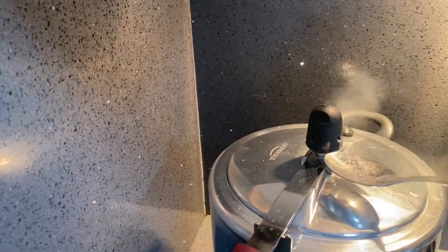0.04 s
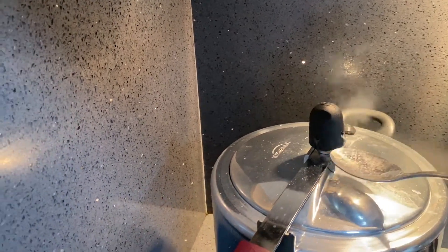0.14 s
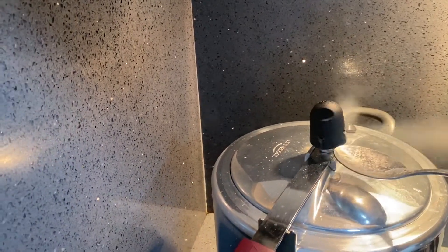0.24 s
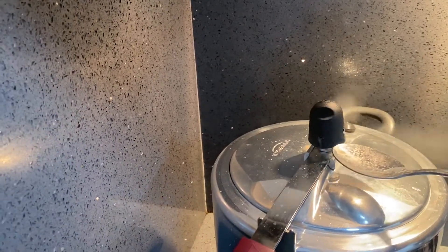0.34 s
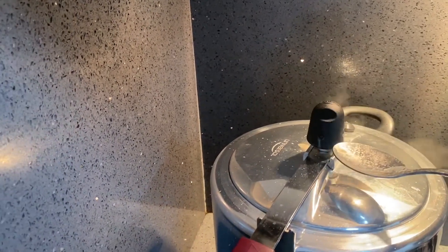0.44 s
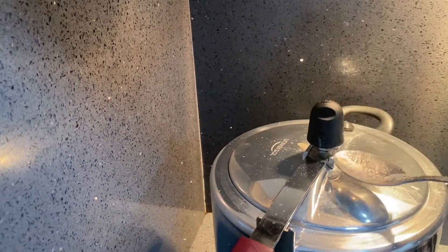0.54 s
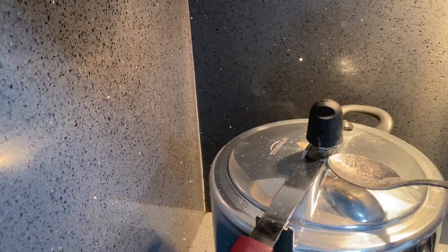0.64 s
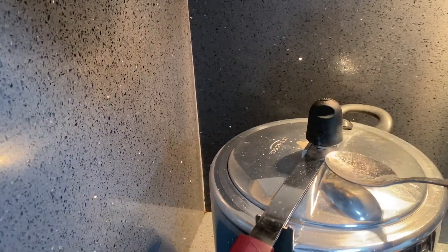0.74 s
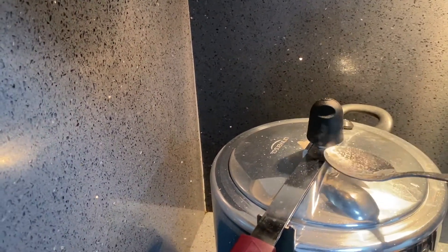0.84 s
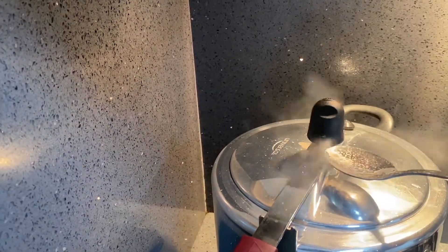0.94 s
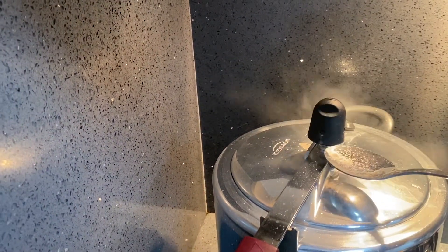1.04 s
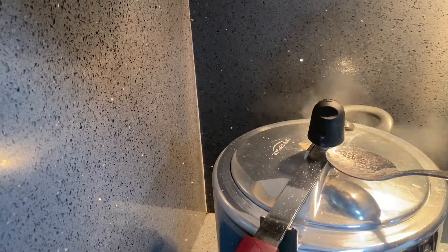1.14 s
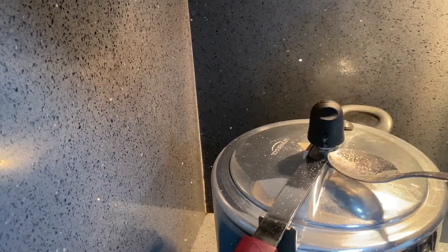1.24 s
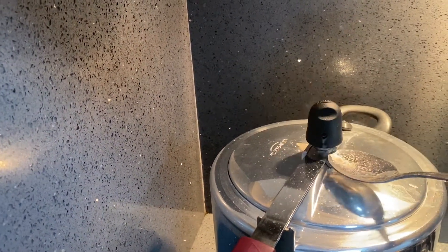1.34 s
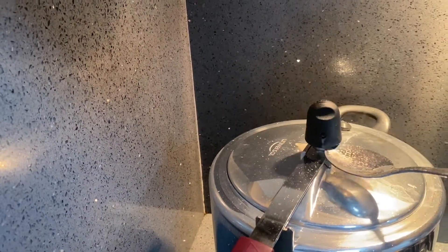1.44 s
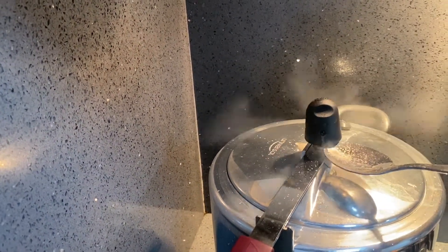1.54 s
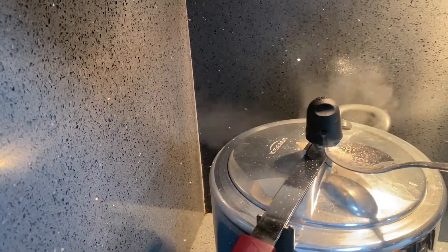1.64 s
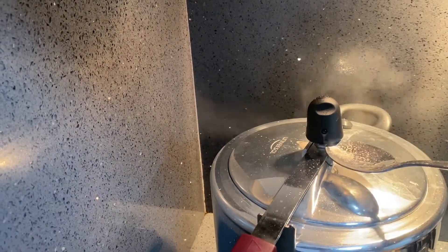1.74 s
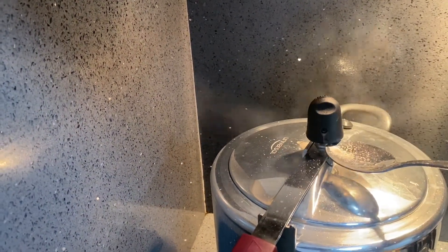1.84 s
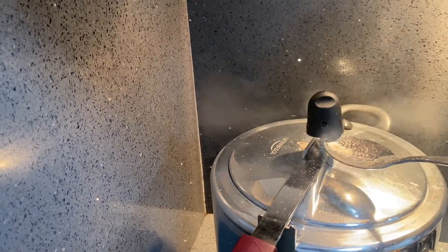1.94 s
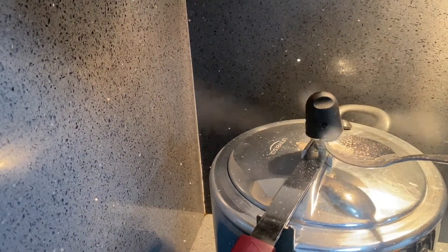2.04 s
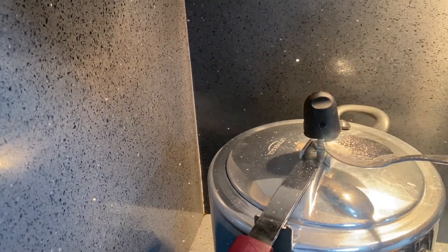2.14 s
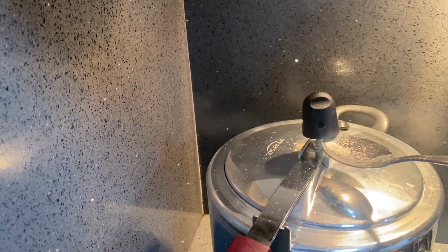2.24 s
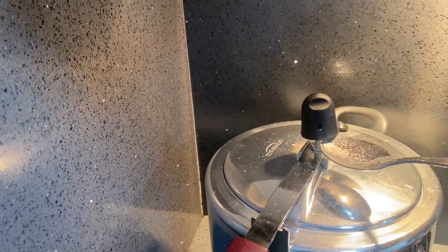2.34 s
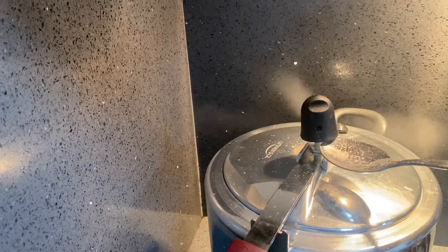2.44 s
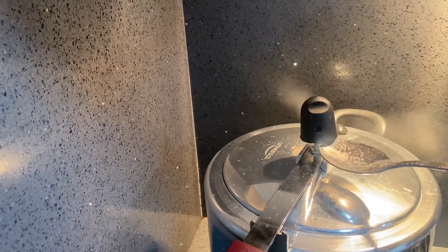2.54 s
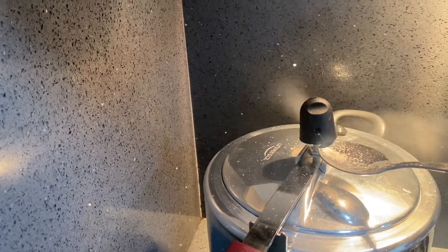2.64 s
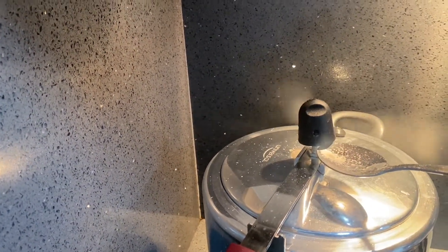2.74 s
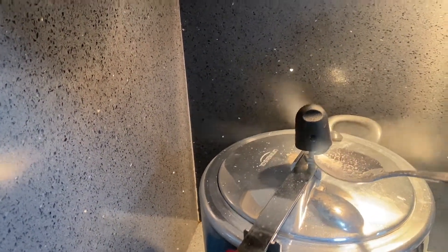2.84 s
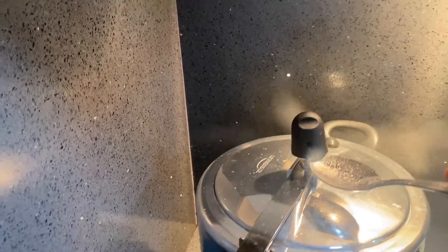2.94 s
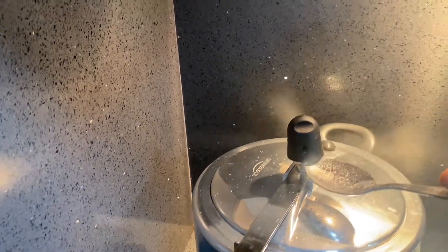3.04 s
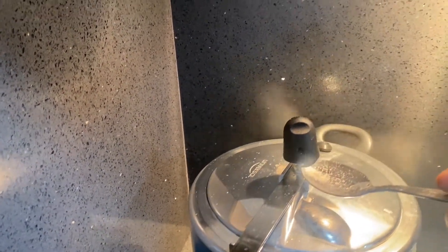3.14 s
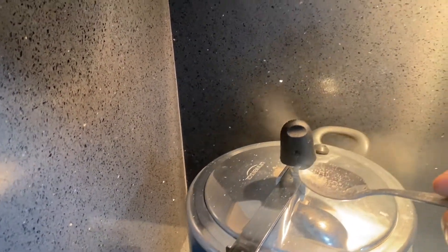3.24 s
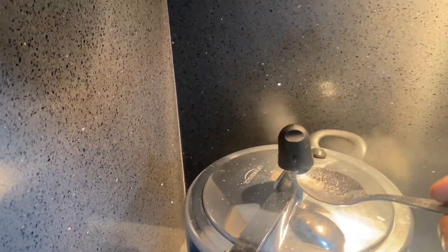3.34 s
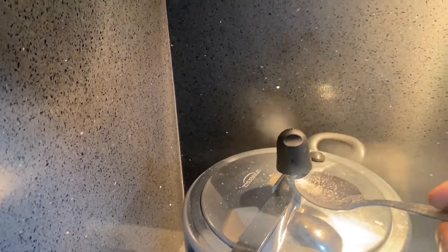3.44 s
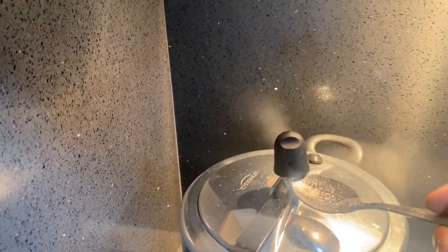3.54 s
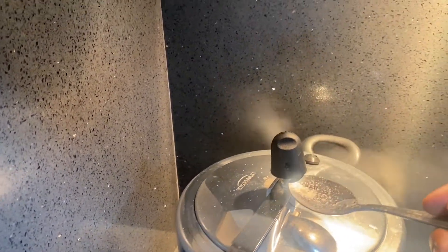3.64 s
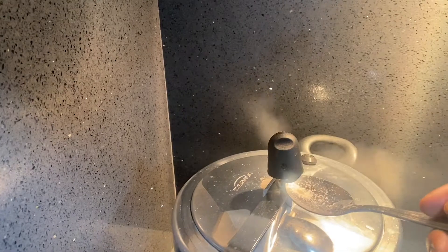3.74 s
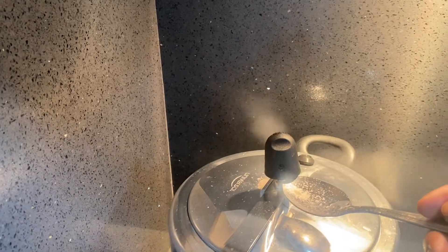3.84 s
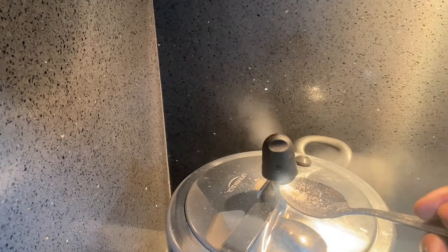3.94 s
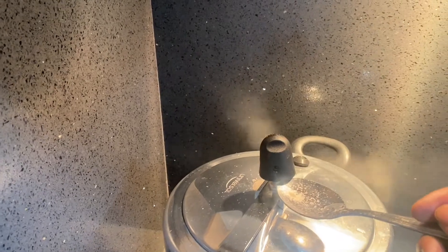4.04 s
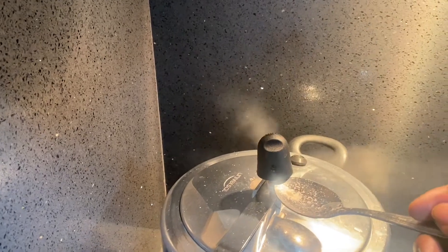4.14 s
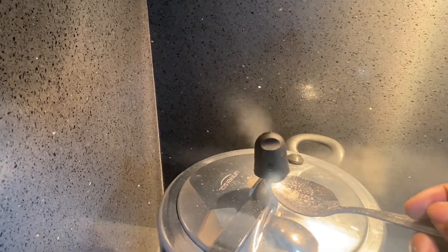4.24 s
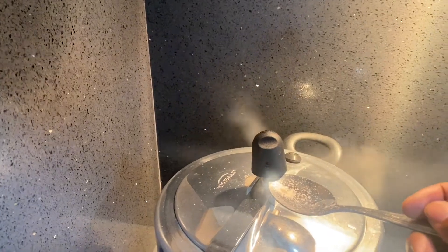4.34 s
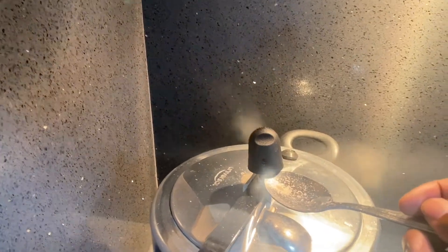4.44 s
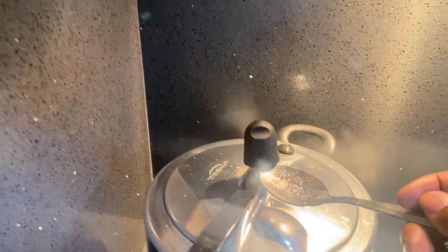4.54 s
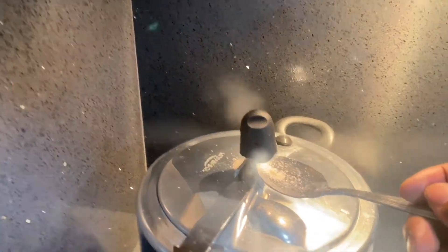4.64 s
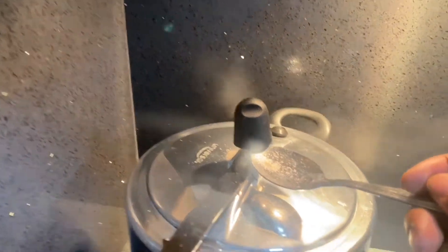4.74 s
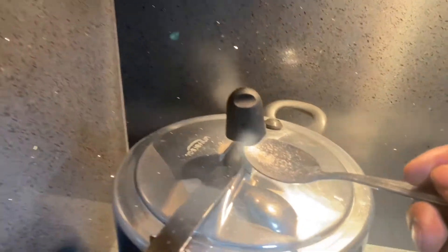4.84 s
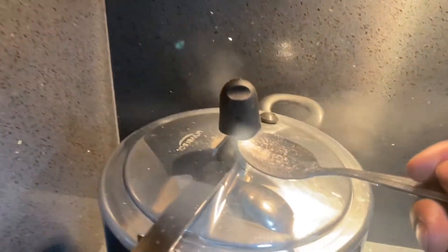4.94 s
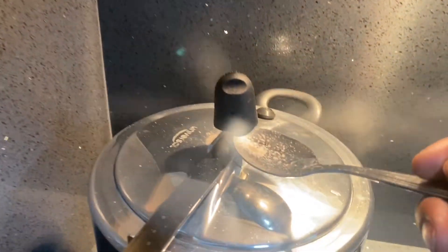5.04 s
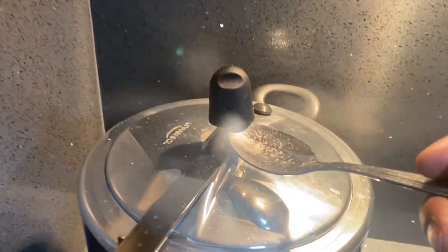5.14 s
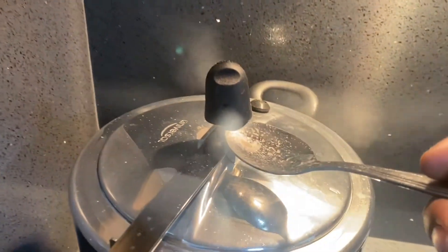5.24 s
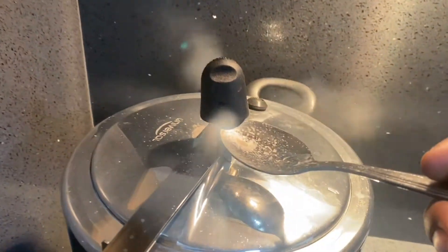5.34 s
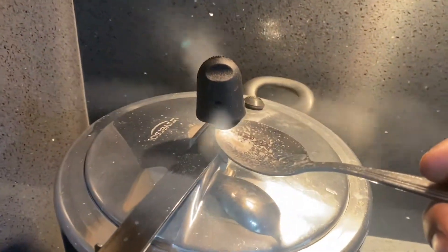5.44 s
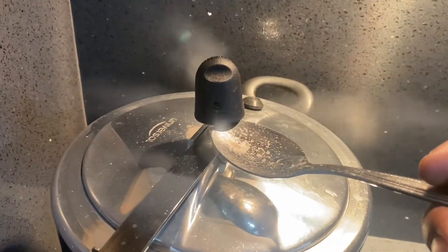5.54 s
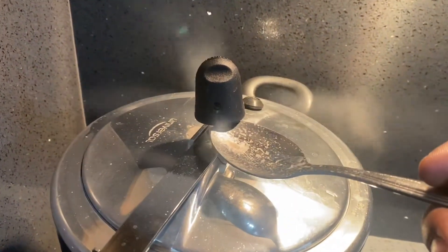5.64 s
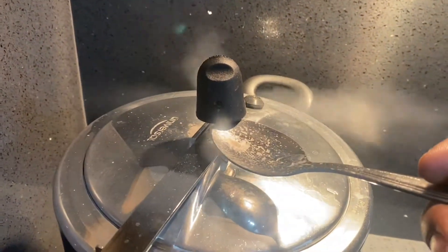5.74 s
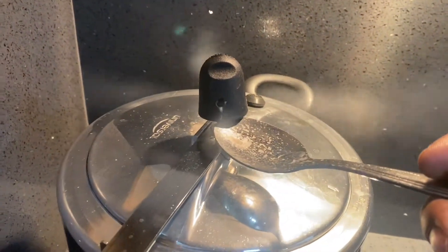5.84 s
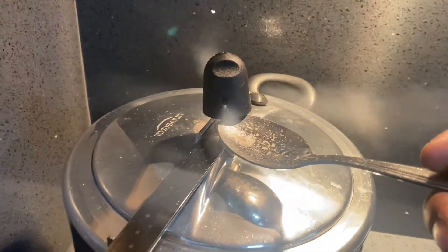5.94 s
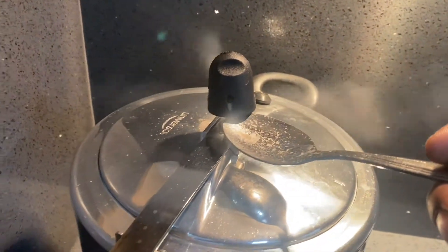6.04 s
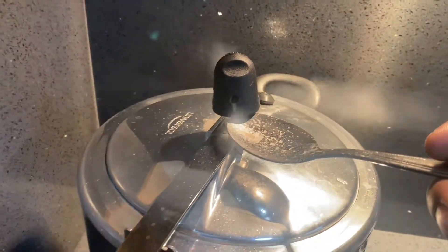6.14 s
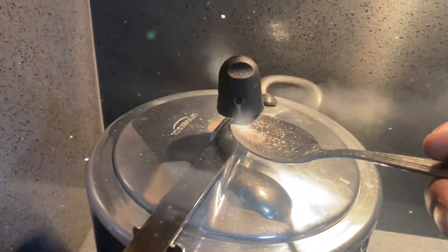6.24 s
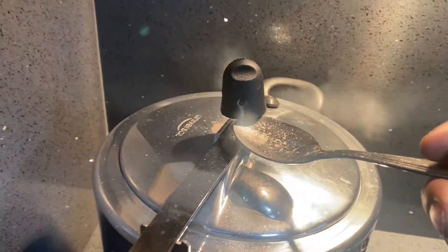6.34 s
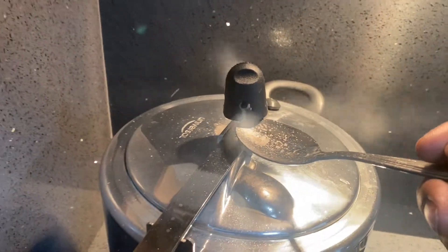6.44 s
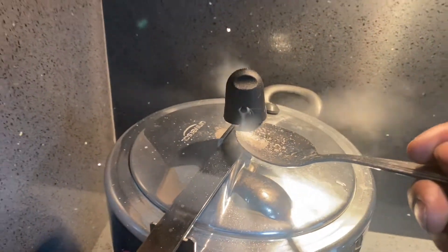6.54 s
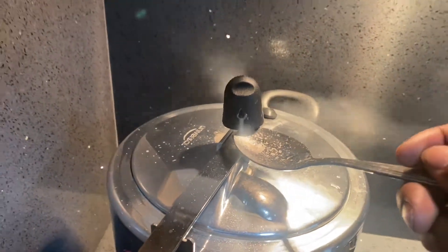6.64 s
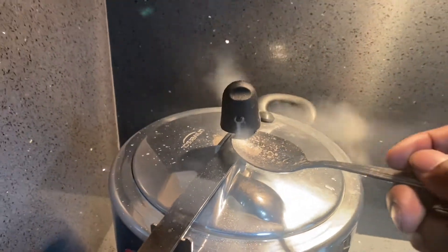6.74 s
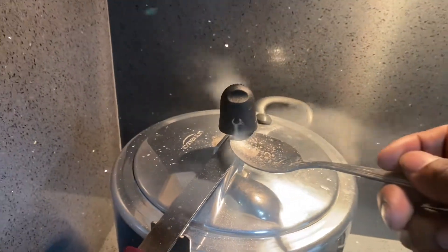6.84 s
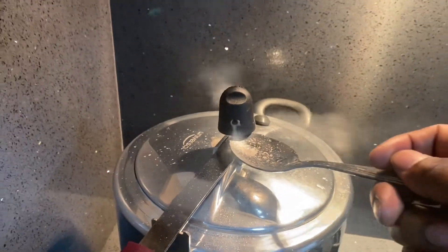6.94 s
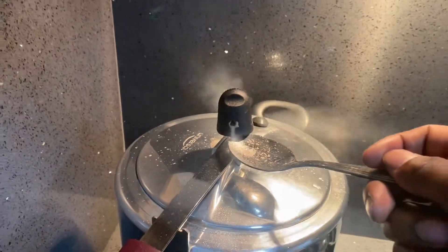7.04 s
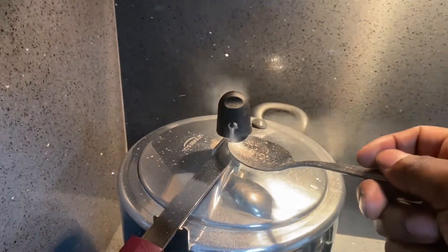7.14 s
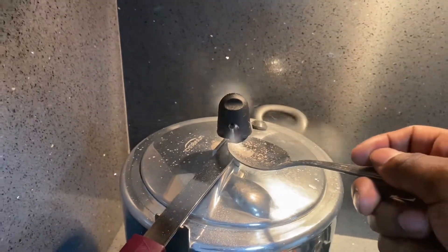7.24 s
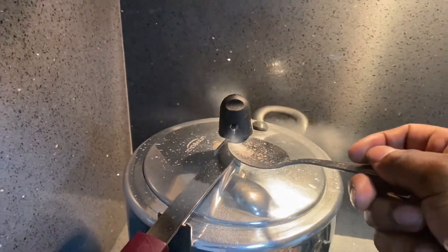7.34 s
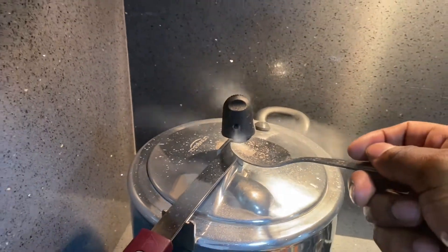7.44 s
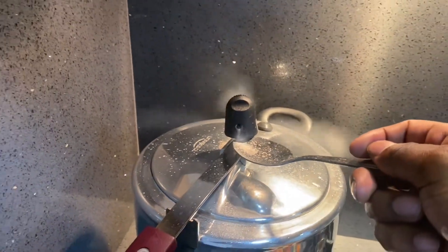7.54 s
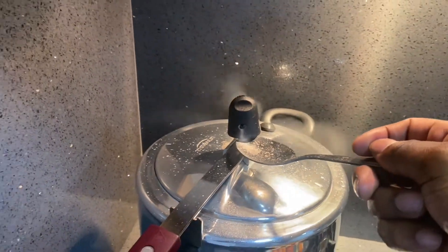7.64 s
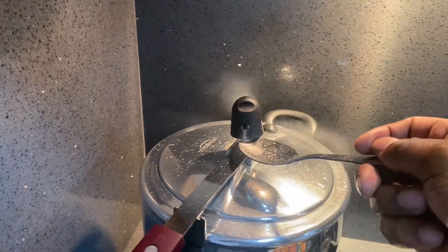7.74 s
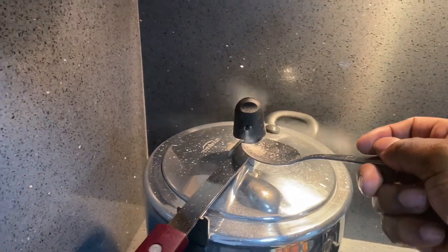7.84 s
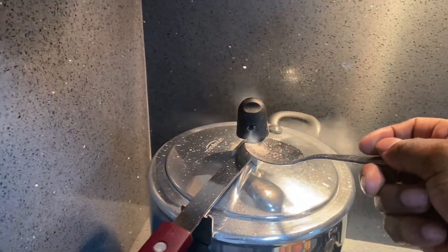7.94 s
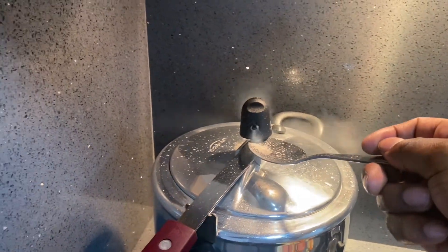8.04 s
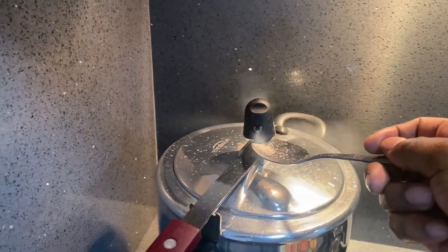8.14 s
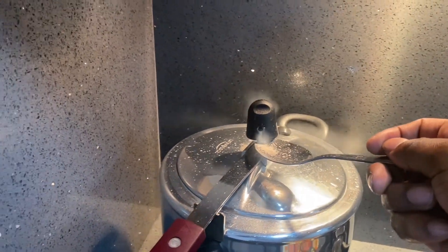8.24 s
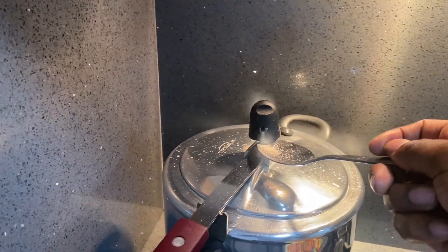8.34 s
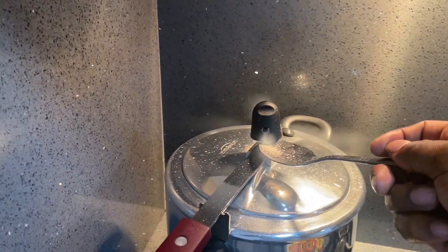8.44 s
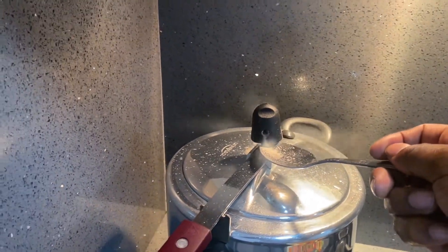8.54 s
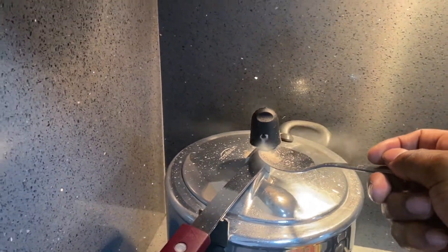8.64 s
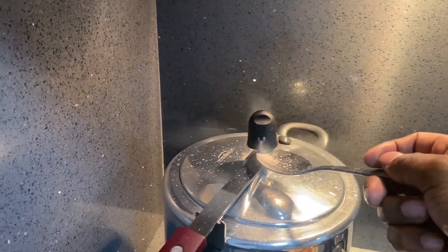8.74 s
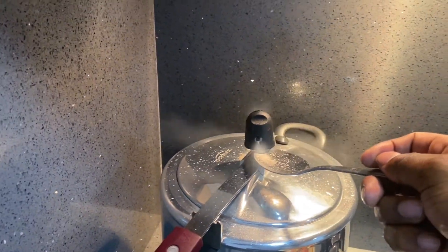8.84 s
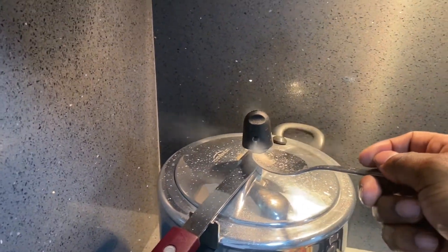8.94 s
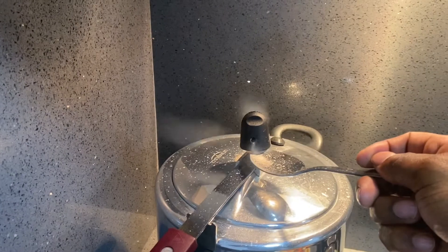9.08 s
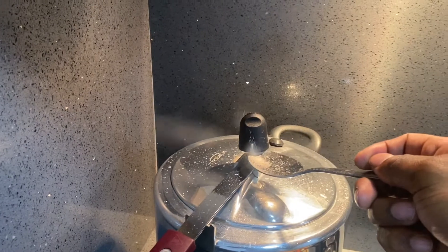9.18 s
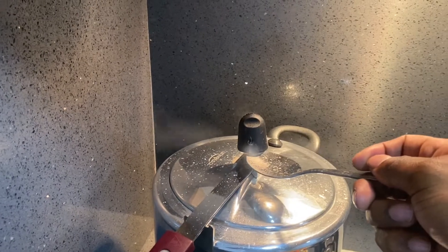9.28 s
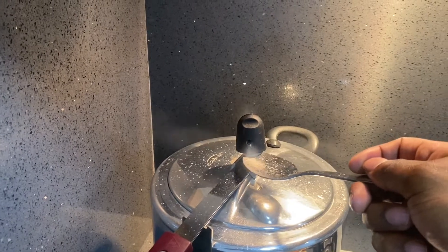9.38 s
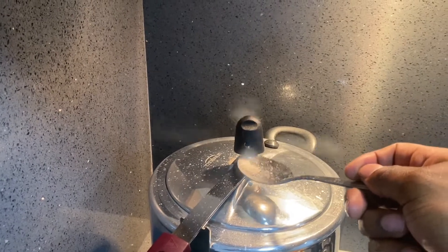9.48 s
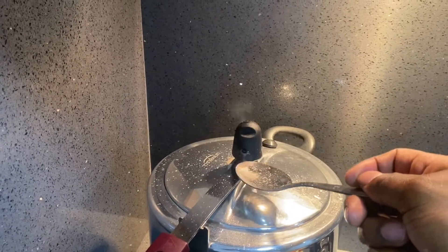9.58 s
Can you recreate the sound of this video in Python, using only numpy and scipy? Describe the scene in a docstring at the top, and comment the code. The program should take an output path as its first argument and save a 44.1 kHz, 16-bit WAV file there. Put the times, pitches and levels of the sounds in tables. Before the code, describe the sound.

Close in a small hard-walled kitchen, a pressure cooker vents as a spoon lifts its weight valve. It is already hissing loudly, shuts with a rattle, gives a second quick burst, then a long jet. The jet gradually softens, then water chokes it into uneven sputters. The cap ticks on its seat, the pot mutters low underneath, and the steam stops abruptly.

```python
"""Steam from a pressure cooker

A spoon lifts the weight valve on a kitchen stove: two short bursts of steam, then a long jet that stops suddenly.
The jet is shaped noise: a hiss from the nozzle and a roar around the cap. It eases as the pressure bleeds off,
and each hold of the spoon gives it other resonances. Later, slugs of water choke the hiss and sputter on the lid.
The cap knocks on its seat, the pot boils underneath, and stirred air puffs on the microphone between hard walls."""
import sys
import numpy as np
from scipy import signal
from scipy.fft import rfft, irfft, next_fast_len
from scipy.io import wavfile
from scipy.ndimage import map_coordinates

SR = 44100
rng = np.random.default_rng(int(sys.argv[2]) if len(sys.argv) > 2 else 0)


def dump(signal):
    """Clip the signal to [-1, 1] and save it as 16-bit WAV at the path in sys.argv[1]."""
    limited = np.clip(np.atleast_2d(signal).T, -1, 1)
    pcm = np.round(limited * 32767).astype(np.int16)
    wavfile.write(sys.argv[1], SR, pcm)


N = 423786
TIME = np.arange(N) / SR  # seconds

HISS_DB, ROAR_DB = -24, -36  # base levels with the valve open, before pressure, water and hold
LEAK_HISS_DB, LEAK_ROAR_DB = -54.5, -69  # base levels of the leak, there even with the valve shut
HISS_TAIL_DB, ROAR_TAIL_DB = -18.5, -10.5  # steam that still escapes while the cap settles
ROAR_WET_DB, ROAR_CHOKED_FROM_DB, ROAR_CHOKED_SHARE = 3, 7, 0.34  # water first feeds the roar, then stifles it too
# how the spoon holds the cap, one row for each gap from LIFTED to TILTED:
# (middle_of_move_s, move_length_s, hiss_db, roar_db, sputter_db, spoon_echo_delay_s)
HOLDS = [(0, .1, 0, -0.6, -55.5, 0.00064), (1.88, 0.14, 0, 0, -62, 0.00051),
         (3.08, 0.48, 0.1, 0.1, -65, 0.000526), (4.72, 0.51, 0.65, 0, -65, 0.0007),
         (6.2, .5, -0.5, .5, -56, 0.000655), (7.08, 0.47, 1.26, 2.5, -49.5, 0.000535)]


def jet(choke_db, wet, roar_pressure_share=0.74, flutter_db=0.46, surge_db=0.72, choked_db=1.8):
    """Valve and pressure set the flow; water chokes the hiss and makes it unsteady."""
    shares = hold_shares()
    hold_hiss_db, hold_roar_db, _, echo_s = np.transpose(HOLDS)[2:] @ shares
    roar, hiss = gap_noise(shares, echo_s)
    surplus_db = pressure_db()

    unsteady_db = choked_db * wet * wobble(45)
    hiss_db = HISS_DB + hold_hiss_db + surplus_db - choke_db + unsteady_db

    stifled_db = ROAR_CHOKED_SHARE * np.maximum(choke_db - ROAR_CHOKED_FROM_DB, 0)
    roar_db = ROAR_DB + hold_roar_db + roar_pressure_share * surplus_db + ROAR_WET_DB * wet - stifled_db

    hiss = hiss * (valve(HISS_TAIL_DB) * amp(hiss_db) + amp(LEAK_HISS_DB))
    roar = roar * (valve(ROAR_TAIL_DB) * amp(roar_db) + amp(LEAK_ROAR_DB))
    flow_db = flutter_db * wobble(350) + surge_db * wobble(40)  # fast flutter, slower surges
    return amp(flow_db) * (hiss + roar)


# the spoon lifts the valve: (opens_s, starts_to_close_s, rise_s, fall_s, level_db)
LIFTS = [(-0.08, 0.332, 0.11, 0.032, 0), (0.863, 1.124, 0.062, 0.024, 0.55),
         (1.402, 9.513, 0.13, .036, -0.35)]
RISE_SHAPE = 0.9  # power of time in the rise
TAIL_DB_PER_S = 142  # how fast the tail dies


def valve(tail_db):
    """How far the valve is open, about 0-1: a rise, a hold, a quick fall and a short tail."""
    opening = np.zeros(N)
    for opens, closes, rise_s, fall_s, db in LIFTS:
        rise = np.clip((TIME - opens) / rise_s, 0, 1) ** RISE_SHAPE
        since = np.maximum(TIME - closes, 0)
        fall = np.exp(-(since / fall_s) ** 2)
        tail = amp(tail_db - TAIL_DB_PER_S * since)
        opening += amp(db) * rise * np.maximum(fall, tail)
    return opening


SURPLUS_DB, VENT_FROM_S, VENT_S = 5, 1.6, 0.8  # stored pressure, start of its decay, time to fall to 37 %


def pressure_db():
    """The surplus of pressure: steady through the short bursts, bleeding away in the long jet."""
    return SURPLUS_DB * np.exp(-np.maximum(TIME - VENT_FROM_S, 0) / VENT_S)


# slugs of water in the gap: (middle_s, length_s, hiss_loss_db)
SLUGS = [(1.88, 0.055, 1.5), (5.357, .07, 3), (5.535, 0.089, 7), (5.7, .11, 13), (5.96, 0.063, 8),
         (6.03, 0.039, 11), (6.115, 0.085, 12), (6.28, 0.12, 20), (6.47, 0.099, 19.5), (6.66, 0.24, 7.5),
         (6.81, .09, 7.5), (6.92, 0.084, 18.5), (7.06, 0.13, 18), (7.47, 0.12, 6), (7.615, 0.077, 7),
         (7.76, 0.23, 6), (7.947, 0.064, 16.5), (8.05, 0.074, 8.5), (8.17, 0.099, 5.5), (8.27, 0.083, 7.5),
         (8.455, 0.072, 10), (8.57, .13, 17.5), (8.9, 0.054, 3.5), (9.01, 0.12, 3.5), (9.497, 0.062, 6.5)]
WET_AT_DB = 2.5  # loss of hiss at which the gap is mostly wet


def water():
    """The slugs' choking of the hiss (dB) and the wetness of the gap (0-1)."""
    choke_db = np.abs(bells(SLUGS, TIME))
    wet = 1 - np.exp(-choke_db / WET_AT_DB)
    return choke_db, wet


def hold_shares():
    """The share of each hold over time; each fades into the next."""
    moves = [np.clip((TIME - s) / move_s + 0.5, 0, 1) for s, move_s, *_ in HOLDS[1:]]
    return -np.diff([np.ones(N), *moves, np.zeros(N)], axis=0)


# the broad tone of the steam: (pitch_hz, level_db)
STEAM = [(400, -17), (780, -19.5), (1080, -11.5), (1400, 0.5), (2200, 4.5), (3500, 2), (5000, -1.5),
         (8500, 3.5), (12000, 0), (14500, 1), (15700, 1)]
# resonances of the gap under the cap, one table for each hold: (pitch_hz, width_hz, boost_db)
LIFTED = [(383, 120, 9.5), (1600, 190, -0.5), (2370, 230, 2.5), (2950, 780, 1.5), (3820, 660, 5),
          (4300, 290, 2.5), (7200, 760, 3), (9140, 760, 3.5), (12300, 400, 4.5), (13200, 500, 5),
          (15100, 1400, -2)]
OPEN = [(1420, 380, 1), (2620, 690, 2), (3400, 630, 0), (4500, 400, 5), (8100, 1500, -2), (9400, 400, 5),
        (12100, 600, 5.5), (13700, 1400, 7)]
STEADY = [(1590, 100, 5), (2540, 210, 5.5), (3780, 750, 4), (4250, 450, 2), (5300, 360, 4),
          (6330, 210, 3.5), (9200, 570, 5.5), (10050, 440, -1), (11000, 1700, 2.5), (13300, 2800, 7.5)]
NEAR = [(970, 390, 10.5), (1776, 120, 9), (2060, 520, 4), (2710, 170, -3), (3040, 510, 7), (3620, 350, 0),
        (4250, 200, 5.5), (4790, 460, 9), (6460, 2000, 5.5), (9900, 1100, 1), (13000, 3100, 7.5)]
PRESSED = [(992, 300, 15), (1410, 270, 5.5), (1970, 290, 6), (2730, 1300, 4), (4850, 580, 4),
           (8850, 1000, -7), (10200, 680, 2.5), (13100, 1400, 6), (14700, 1000, -5)]
TILTED = [(1485, 265, 6), (2130, 450, 8), (2530, 340, 5.5), (3770, 1080, 9.8), (4430, 250, -2.5),
          (5310, 1560, 4), (8000, 350, 3), (10000, 1900, 3), (13150, 2500, 9)]


def gap_noise(shares, echo_s, split_hz=3300, room_db=-13):
    """Turbulence rings the gap under the cap: a roar below, the nozzle's hiss above."""
    turbulence = walls(spoon_echo(noise(), echo_s))
    room = filtered(kitchen(turbulence), lambda hz: 1 / (1 + (hz / 7000) ** 4))  # dull above 7 kHz
    turbulence = colour(turbulence + amp(room_db) * room, STEAM, LID)
    roar, hiss = np.zeros((2, 2, N))
    for share, gap in zip(shares, [LIFTED, OPEN, STEADY, NEAR, PRESSED, TILTED]):
        steam = filtered(turbulence, lambda hz: amp(bells(gap, hz)))
        low = filtered(steam, lambda hz: 1 / (1 + (hz / split_hz) ** 10))
        roar += share * unit(low)
        hiss += share * unit(steam - low)
    return roar, hiss


SPOON_LEFT_DB, SPOON_RIGHT_DB = -16, -30  # the spoon's echo at the two microphone ports


def spoon_echo(x, delay_s):
    """The spoon's bowl throws the sound back; the comb of peaks and dips glides as the spoon moves."""
    late = np.array([map_coordinates(side, [(TIME - delay_s) * SR]) for side in x])
    return x + amp([[SPOON_LEFT_DB], [SPOON_RIGHT_DB]]) * late


def whistle(pitch_hz=4560, width_hz=80, level_db=-35.5):
    """A breathy whistle from the cap's rim: narrow noise that fades with the surplus of pressure."""
    band = filtered(noise(), lambda hz: 1 / (1 + ((hz - pitch_hz) / width_hz) ** 2))
    strength = valve(HISS_TAIL_DB) ** 2 * pressure_db() / SURPLUS_DB
    return amp(level_db) * strength * unit(band)


# the broad tone of the sputter: (pitch_hz, level_db)
WET = [(90, -14), (190, -5), (310, -1.5), (400, -11.5), (580, -6.5), (730, -3), (980, -0.5), (1250, -0.5),
       (2200, -15.5)]
# resonances of the pot and its lid: (pitch_hz, width_hz, boost_db)
LID = [(118, 18, 9), (308, 74, 1), (453, 31, 6.5), (559.5, 46, 7.5), (660, 33, 4), (839, 92, 4.5),
       (1080, 97, 5.5), (1287, 69, 5.5), (1437, 67, 3.5), (2240, 22, 3.3), (2716, 31, 6.5), (2934, 46, 3),
       (4570, 80, 2.5), (7300, 54, 2), (10230, 180, 2.5)]


def sputter(wet, shut_db=-60, wet_db=-40.5, half_open_db=-46, lump_db=2):
    """Condensed water breaks the flow into lumps that drum on the lid, most when the gap is wet or half open."""
    _, _, hold_db, _ = np.transpose(HOLDS)[2:] @ hold_shares()
    opening = np.clip(valve(HISS_TAIL_DB), 0, 1)
    half_open = 4 * opening * (1 - opening)  # 1 when half open, 0 when shut or fully open
    flow = opening * amp(pressure_db()) * np.hypot(amp(hold_db), amp(wet_db) * wet)
    level = amp(shut_db) + flow + amp(half_open_db) * half_open
    drumming = colour(noise(), WET, LID) * amp(lump_db * wobble(70))
    return level * unit(drumming)


# the cap touches its seat: (start_s, rattle_level_db, time_to_fall_60_db_s)
TICKS = [(0.362, -31, 0.17), (0.395, -34.5, 0.15), (0.828, -45, 0.12), (0.883, -35, 0.08),
         (1.098, -40.5, 0.2), (1.157, -39, 0.15), (1.242, -51, .06), (1.322, -40, 0.05), (1.889, -30, 0.13),
         (5.187, -30, 0.06), (5.297, -32.5, 0.055), (5.357, -26.5, 0.046), (5.378, -35, 0.032),
         (5.488, -30, 0.057), (9.462, -30, .08), (9.488, -27, 0.14)]
# the broad tone of the cap: (pitch_hz, level_db)
CAP = [(250, -10), (600, -7), (900, -3.5), (1900, 1), (3500, -4), (7000, -9), (15000, -24)]
# the cap's ring: (pitch_hz, width_hz, boost_db)
KNOCK = [(460, 170, 12.5), (830, 100, 15.5), (1100, 130, 7), (1770, 800, 5)]


def ticks(crack_db=-5.0, crack_s=0.025, room_db=-21):
    """The cap knocks on its seat: a thin crack and a quickly damped rattle."""
    blows = np.zeros((2, N + SR))  # fading levels of the rattle and the crack
    t = np.arange(SR // 5) / SR
    for s, db, t60 in TICKS:
        start = round(s * SR)
        blows[:, start:start + len(t)] += amp(db - 60 * t / np.array([[t60], [crack_s]]))
    rattle, crack = blows[:, :N]
    knocks = rattle * unit(colour(noise(), CAP, KNOCK)) + amp(crack_db) * crack * unit(noise())
    return knocks + amp(room_db) * kitchen(knocks)


# levels over time, before the gains in boil(): (time_s, boil_db, rumble_db)
BOIL = [(0, -49, -56), (1.5, -50, -58), (2.6, -54.5, -60), (3.3, -60.5, -73), (4.3, -58.5, -70),
        (4.8, -56, -60), (5.5, -54, -61), (5.8, -67, -71), (6.2, -51.5, -71), (6.95, -47.5, -70),
        (7.25, -52, -63), (7.65, -46.5, -52.5), (8.5, -47, -61), (8.8, -51.5, -60), (9.35, -52.5, -58),
        (9.61, -45, -48)]
# the broad tone of the boiling pot: (pitch_hz, level_db)
POT = [(45, -37), (70, 0), (90, 0.5), (120, 1), (165, -4), (230, -11), (450, -21.5)]
# the broad tone of the stove's rumble: (pitch_hz, level_db)
DEEP = [(18, -46), (35, -18), (55, 13), (70, -1), (110, -33)]


def boil(wet, gain_db=2, deep_db=2, wet_db=1, lump_db=0.5):
    """The boiling pot mutters, harder when it throws up water, over a deep rumble from the stove."""
    boil_db, rumble_db = curves(BOIL)
    mutter = colour(noise(), POT, LID) * amp(lump_db * wobble(20))
    pot = amp(boil_db + gain_db + wet_db * wet) * unit(mutter)
    rumble = amp(rumble_db + deep_db) * unit(colour(noise(), DEEP))
    return pot + rumble


# soft thuds of air on the microphone: (middle_s, peak_db, top_hz, half_length_s)
PUFFS = [(2.085, -31, 132, 0.0088), (2.132, -22, 176, 0.02), (2.404, -33.5, 58, 0.032),
         (2.537, -33.5, 220, 0.018), (2.593, -36, 160, 0.028), (2.648, -32.5, 179, 0.02),
         (4.593, -38, 278, 0.014), (4.637, -41, 328, .012), (4.9, -37, 330, 0.014),
         (4.934, -32, 430, 0.009), (5.213, -33.5, 430, .009), (5.25, -32, 524, 0.0081),
         (5.308, -39, 250, .012)]
# the broad tone of the moving air: (pitch_hz, level_db)
DRAUGHT = [(15, -46), (45, -3.5), (90, 3), (200, -1), (600, -7)]


def puffs():
    """Each waft of stirred air is a short swell of low noise, cut off above its own top pitch."""
    out = np.zeros((2, N))
    t = np.arange(-SR // 10, SR // 10) / SR
    air = colour(noise(), DRAUGHT)
    for s, db, top_hz, half_s in PUFFS:
        span = round((s + t[0]) * SR) + np.arange(len(t))
        lowpass = signal.butter(2, top_hz, fs=SR, output="sos")
        waft = signal.sosfiltfilt(lowpass, air[:, span]) * np.exp(-(t / half_s) ** 2)
        out[:, span] += amp(db) * waft / np.abs(waft).max()
    return out


# a kitchen appliance: (pitch_hz, level_db)
HUM = [(530, -79.5)]


def hum(drift=0.37):
    """A faint tone under everything; its phase wanders by about drift radians."""
    tone = 0
    for hz, db in HUM:
        phase = 2 * np.pi * hz * TIME + drift * wobble(7.5)
        tone = tone + amp(db) * np.sqrt(2) * np.sin(phase)  # root 2: the level is rms
    return tone


# how far the echoes' detour shrinks or grows: (time_s, relative_detour)
LEAN = [(0, 0.86), (2.9, 0.93), (3.4, 0.95), (4.4, 0.87), (5.2, 1.1), (6.1, 1.13), (7.3, .95), (9.61, 0.9)]
# echoes from the lid and walls, delays at a detour of 1: (left_delay_s, right_delay_s, level_db)
WALLS = [(.00082, 0.00072, -20.5), (.00153, 0.0012, -16), (.0029, .003, -20.5)]


def walls(x):
    """Close echoes comb the steam; the comb slides as the microphone leans in."""
    detour, = curves(LEAN)
    echoes = np.zeros((2, N))
    for left_s, right_s, db in WALLS:
        late = [np.interp(TIME - delay * detour, TIME, side) for delay, side in zip((left_s, right_s), x)]
        echoes += amp(db) * np.array(late)
    return x + echoes


# how long the room rings: (pitch_hz, time_to_fall_60_db_s)
KITCHEN = [(200, 0.14), (2000, 0.36), (12000, 0.1)]


def kitchen(x):
    """The room's short tail: fading noise that dies fastest in the high treble."""
    hz, t, z = signal.stft(rng.standard_normal((2, SR // 3)), SR, nperseg=256)
    decay = amp(-60 * t / along(KITCHEN, hz)[:, None])
    tail = signal.istft(z * decay, SR, nperseg=256)[1]
    return signal.fftconvolve(x, tail / np.linalg.norm(tail[0]), axes=1)[:, :N]


# how alike left and right are: (pitch_hz, likeness_0_to_1)
ALIKE = [(150, 0.98), (330, 0.75), (550, 0.31), (1300, 0.92), (1800, 0.26), (2300, 1), (3300, 0.5),
         (4100, 1), (5300, 0.44), (7000, 0.37), (8500, 0.91), (12000, 1)]
# how much louder the left is: (pitch_hz, left_minus_right_db)
LEFTWARD = [(200, 0), (700, 2), (1300, 3), (1850, 6.5), (2300, .5), (2800, 4), (3600, 3), (4100, 0.5),
            (4900, 6.5), (5900, 4.5), (7500, 2), (8700, 0)]
# how far the left is ahead in phase: (pitch_hz, lead_radians)
LEAD = [(200, 0.11), (1900, 0.65), (2500, 0.78), (3600, 0.88), (5500, 1.37), (6800, 0)]


def noise():
    """White noise as the two microphone ports hear it: partly alike, unequal in level and phase."""
    half = np.array([[0.5], [-0.5]])  # each port takes half of the difference

    def spread(hz):
        turn = np.arccos(np.clip(along(ALIKE, hz), -1, 1)) / 2
        return np.array([np.cos(turn), np.sin(turn)])

    def place(hz):
        return amp(half * along(LEFTWARD, hz)) * np.exp(1j * half * along(LEAD, hz))

    mid, side = filtered(rng.standard_normal((2, N)), spread)
    return filtered(np.array([mid + side, mid - side]), place)


def amp(db):
    """Decibels to gain."""
    return 10 ** (np.asarray(db) / 20)


def unit(x):
    """Scale a stereo pair so that its middle (the mean of left and right) has rms 1."""
    return x / np.sqrt(np.mean(x.mean(0) ** 2) + 1e-20)


def along(points, hz):
    """Read a curve of (pitch_hz, value) points on a log pitch axis."""
    f, v = np.transpose(points)
    return np.interp(np.log(hz + 1), np.log(f + 1), v)


def curves(rows):
    """One value per sample for each column after the time."""
    s, *cols = np.transpose(rows)
    return [np.interp(TIME, s, c) for c in cols]


def bells(rows, x):
    """A sum of bell shapes (centre, width, dB) along pitch or time."""
    return sum(db * 0.5 ** np.minimum((2 * (x - centre) / width) ** 2, 20) for centre, width, db in rows)


def wobble(rate):
    """A smooth random curve with rate random points a second."""
    return map_coordinates(rng.standard_normal(int(N * rate / SR) + 4), [TIME * rate], order=2)


def filtered(x, response):
    """Multiply the spectrum of x by a response of frequency."""
    size = next_fast_len(N + 8192)  # spare room so that the end does not wrap onto the start
    return irfft(rfft(x, size) * response(np.fft.rfftfreq(size, 1 / SR)), size)[..., :N]


def colour(x, spectrum, resonances=()):
    """Shape x by a smooth spectrum with resonances on top."""
    return filtered(x, lambda hz: amp(along(spectrum, hz) + bells(resonances, hz)))


def scene():
    """The valve and the pot, close to the microphone."""
    choke_db, wet = water()
    return jet(choke_db, wet) + whistle() + sputter(wet) + boil(wet) + hum() + puffs() + ticks()


TOP_HZ = 15750  # upper band limit


def record(dry, lag_from_hz=6550, lag_s=0.000272):
    """The treble reaches the left channel slightly after the right; nothing is kept above the band limit."""
    def response(hz):
        cycles = np.outer([0.5, -0.5], np.maximum(hz - lag_from_hz, 0)) * lag_s
        return np.exp(-2j * np.pi * cycles) * (hz < TOP_HZ)
    return filtered(dry, response)


dry = scene()
out = record(dry)
dump(out)
```